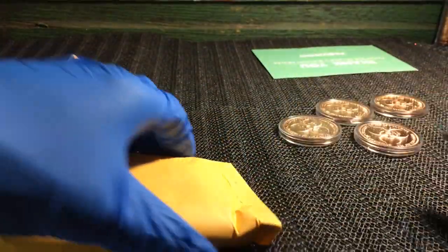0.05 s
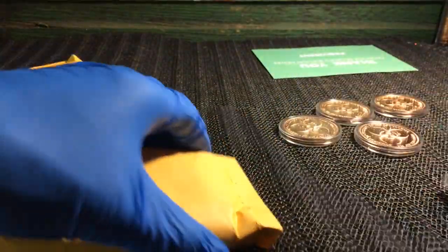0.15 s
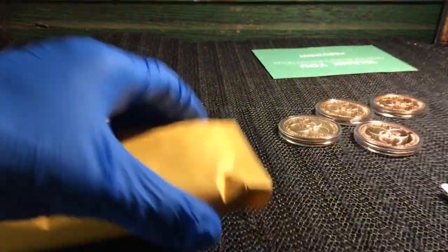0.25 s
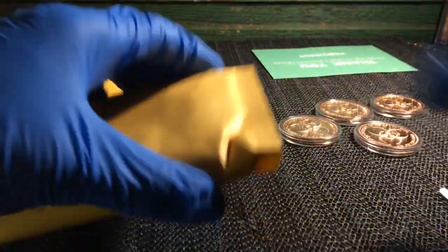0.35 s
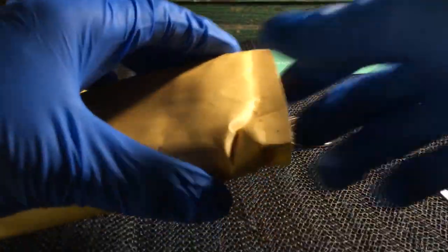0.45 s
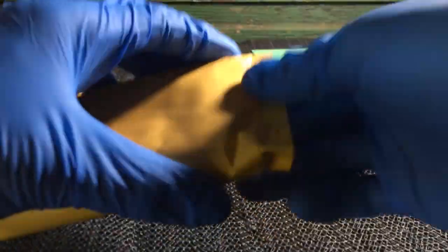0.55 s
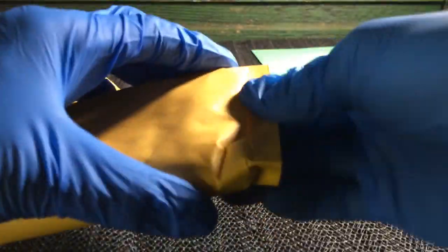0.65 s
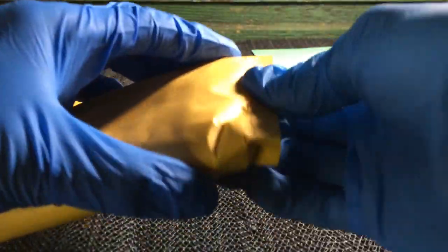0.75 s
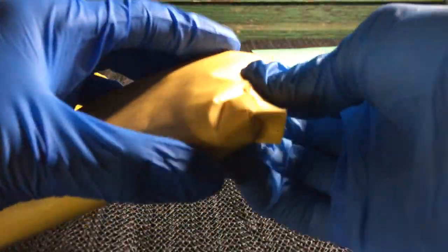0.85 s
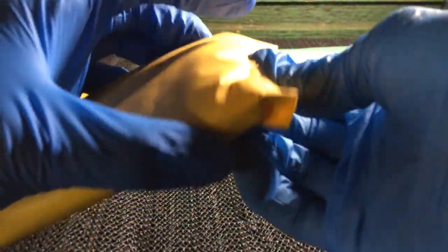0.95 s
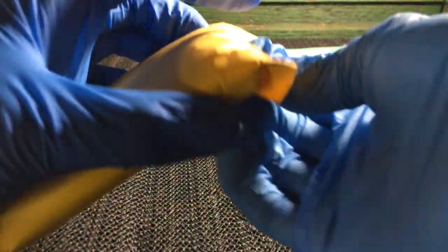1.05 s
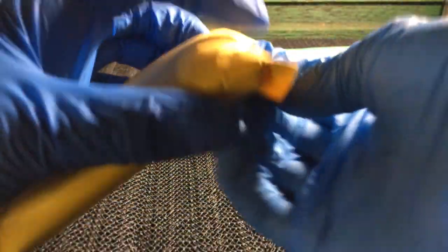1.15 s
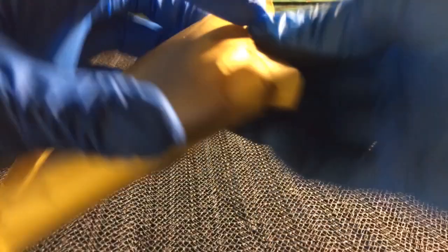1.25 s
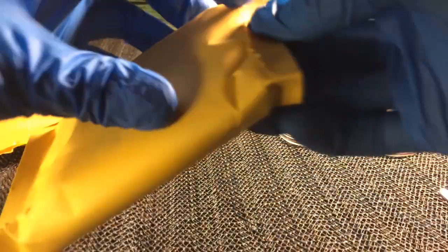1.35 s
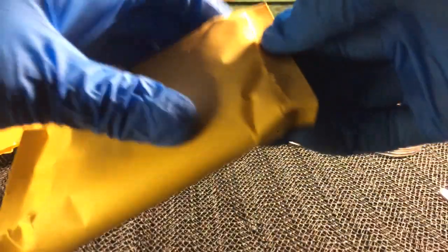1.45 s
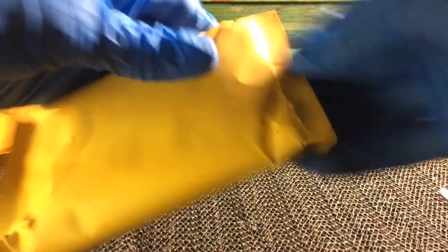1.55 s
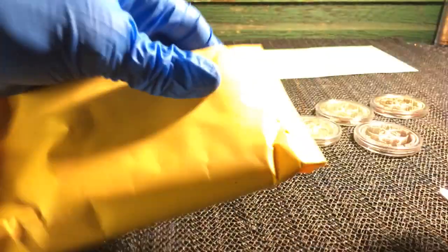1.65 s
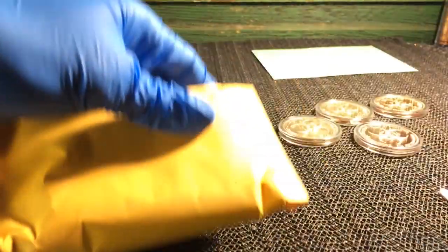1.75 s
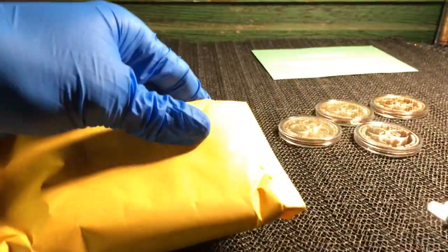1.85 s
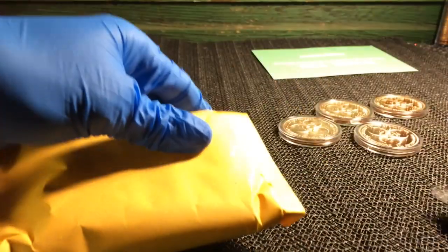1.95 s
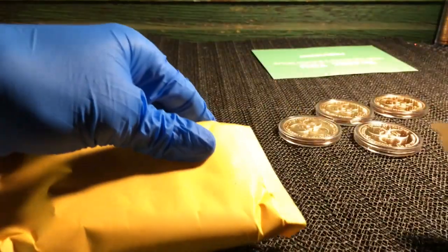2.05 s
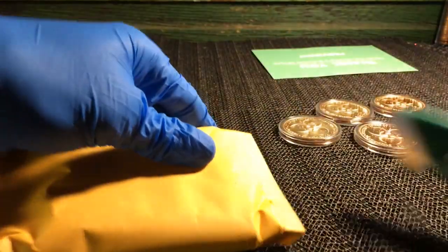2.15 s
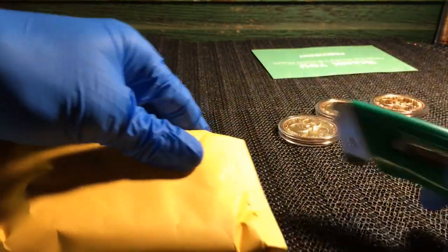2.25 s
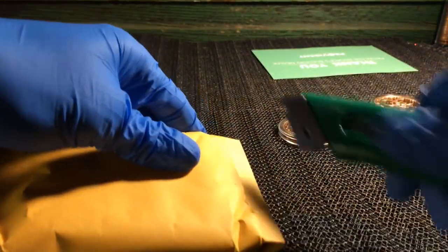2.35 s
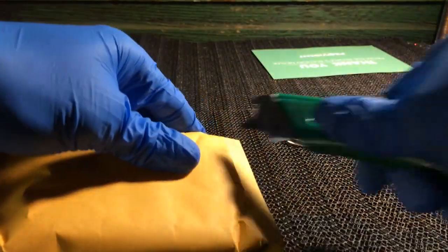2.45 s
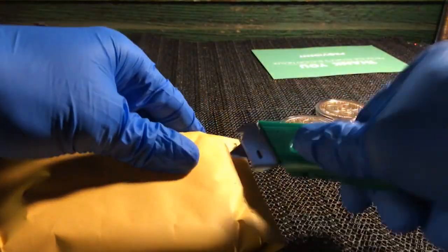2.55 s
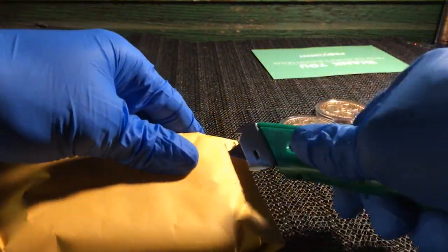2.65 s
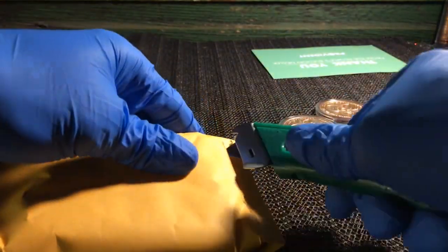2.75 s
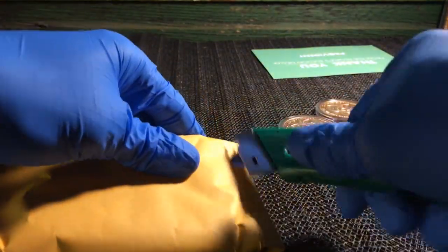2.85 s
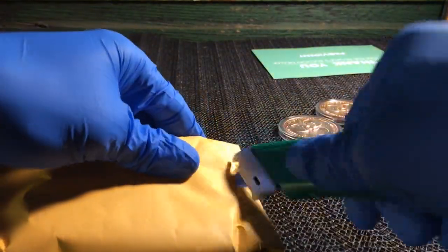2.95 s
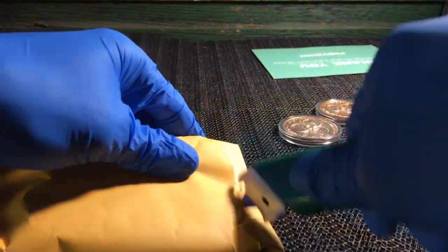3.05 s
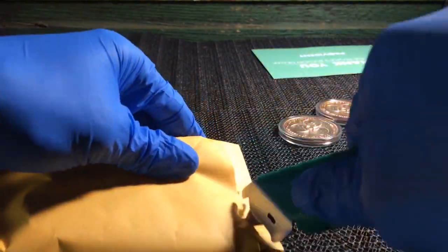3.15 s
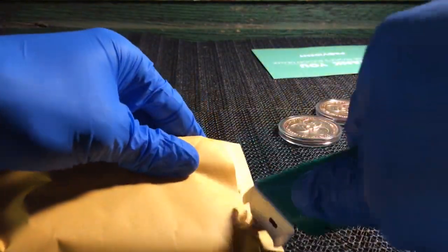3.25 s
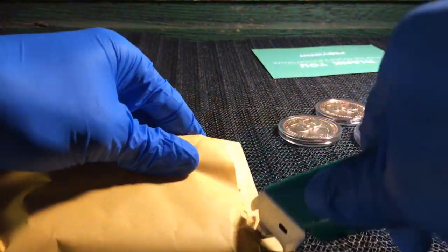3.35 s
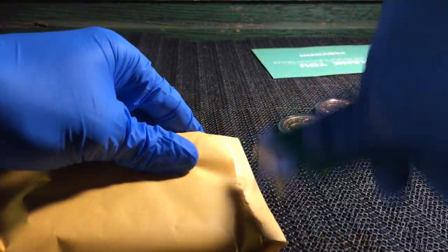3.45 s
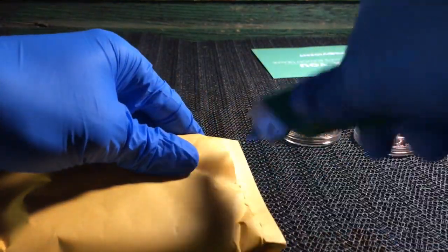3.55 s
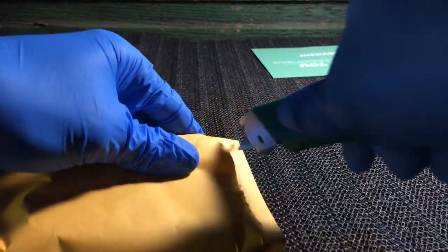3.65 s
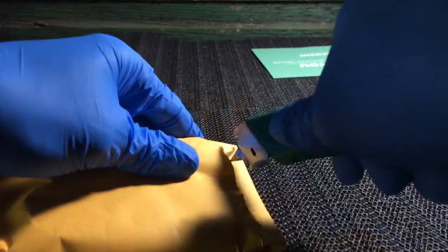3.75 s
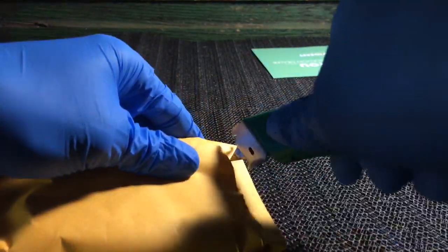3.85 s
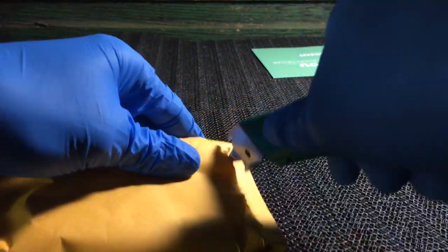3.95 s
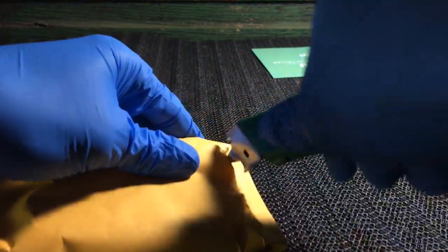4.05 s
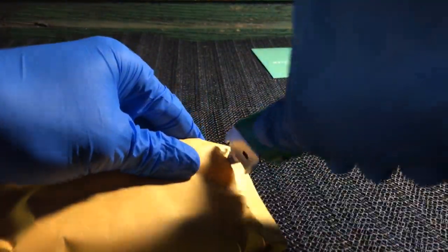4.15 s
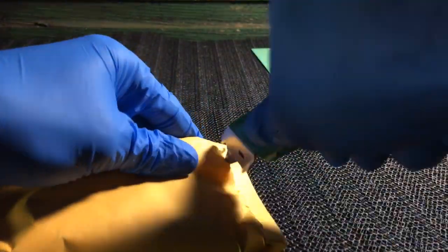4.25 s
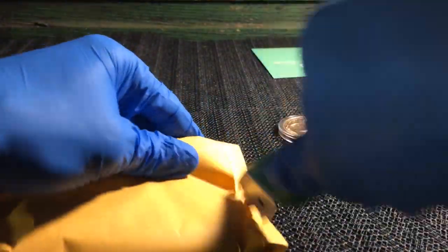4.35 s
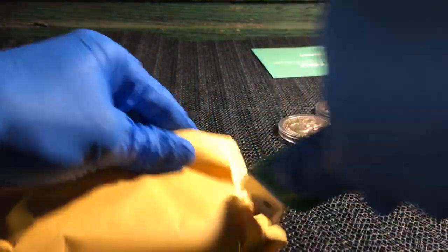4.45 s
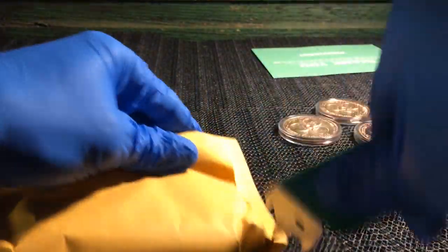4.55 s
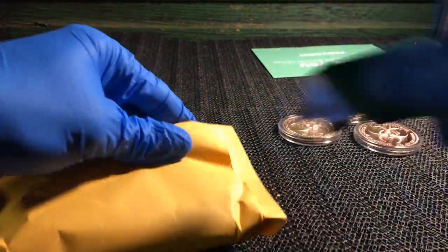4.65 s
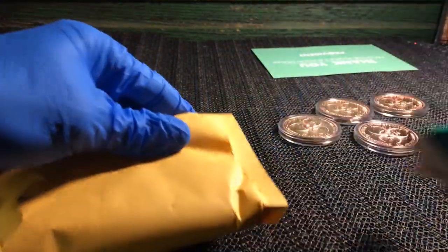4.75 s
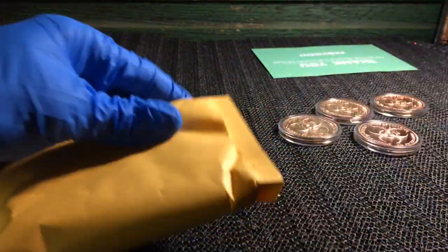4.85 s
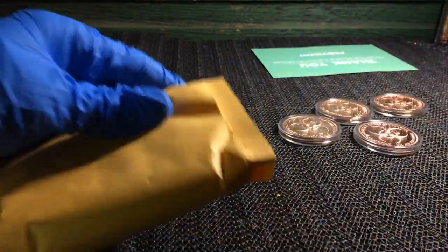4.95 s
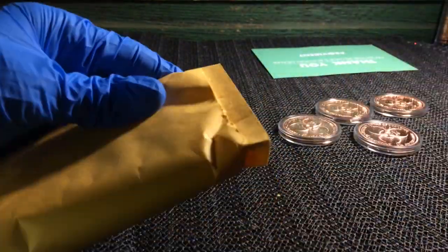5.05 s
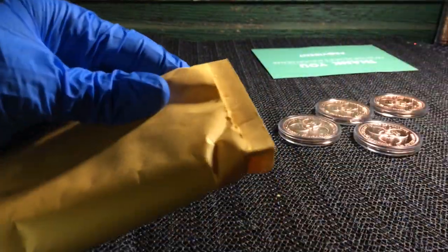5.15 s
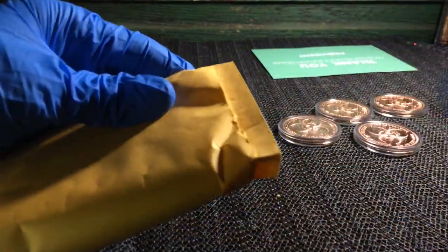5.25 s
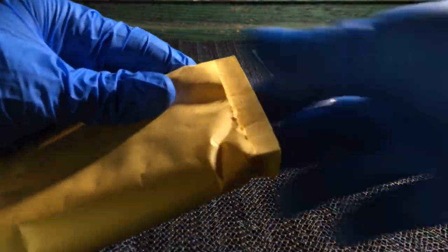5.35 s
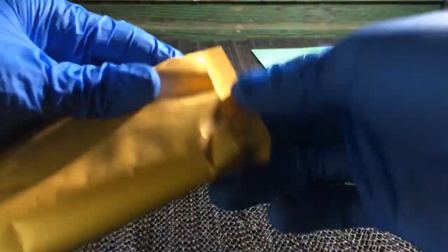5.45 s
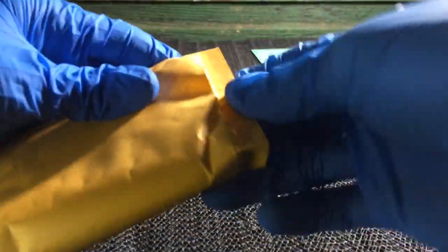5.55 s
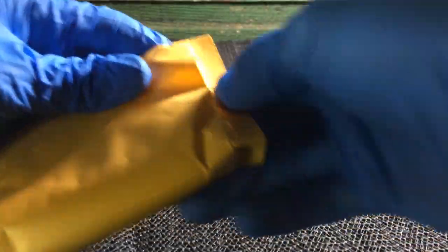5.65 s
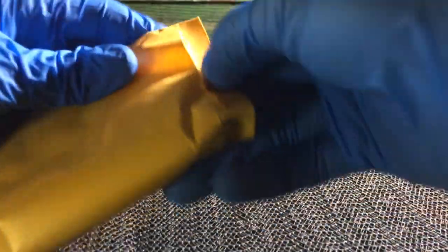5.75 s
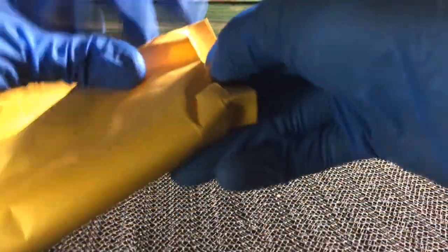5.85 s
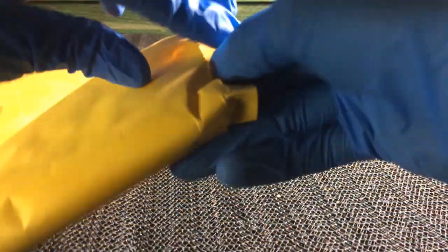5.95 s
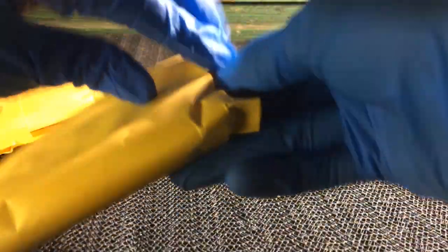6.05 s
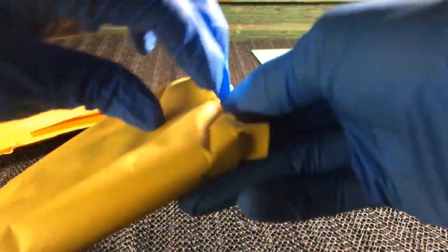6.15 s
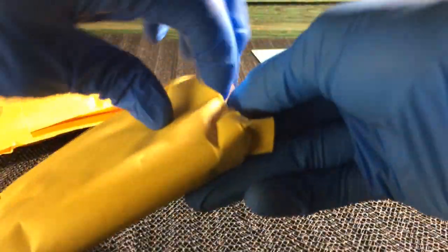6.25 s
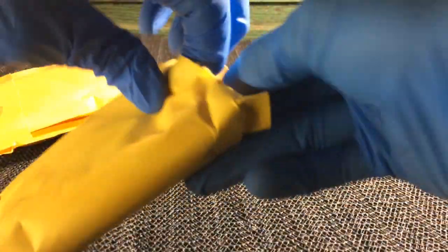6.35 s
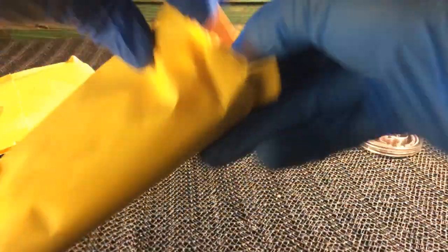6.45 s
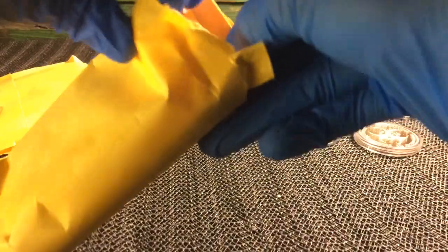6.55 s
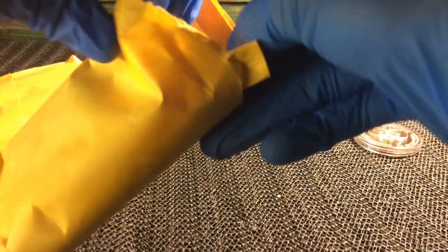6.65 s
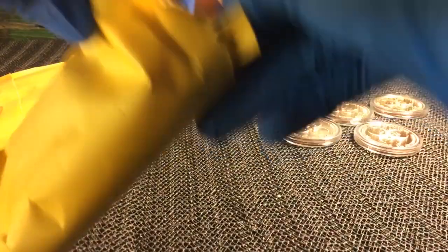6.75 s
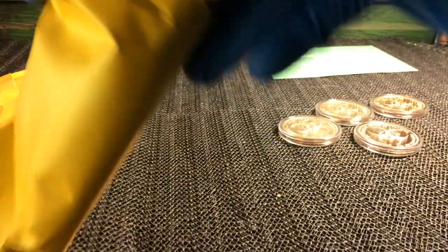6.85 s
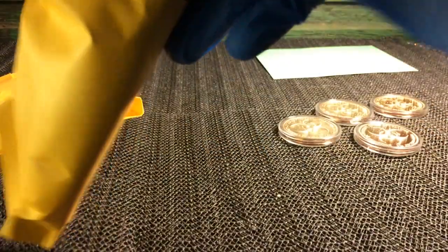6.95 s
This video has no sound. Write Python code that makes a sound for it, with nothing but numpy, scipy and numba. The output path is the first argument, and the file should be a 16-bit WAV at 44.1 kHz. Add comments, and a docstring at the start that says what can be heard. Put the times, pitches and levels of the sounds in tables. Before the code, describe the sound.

A small, quiet, dry room with faint low rumble and hiss, heard through one very close microphone. From 0 s, gloved hands lightly rub and lift a padded paper envelope, with a soft low bump at 0.3. Sharp crinkles and hollow paper pops cluster around 0.55-0.95, then looser creases and sliding rustle continue to 1.85, where a dull table bump lands. Handling quiets until a utility knife slider clicks at about 2.4-2.5, bright and hard. Fine, scratchy cutting crackles swell near 3.1, with shorter strokes at 3.35 and 3.5 and a lighter one at 4.0. A loud abrupt rip with a short glove squeak hits at 4.4, trailing scrapes to 4.6. Soft rustles and muffled thuds follow around 5.0-5.3, crinkles at 5.75 and 5.9, then a dense, crisp crumpling burst at 6.35-6.6, thinning into rubbing and a last bump near 6.9.

```python
"""Opening a padded envelope

A small quiet room, one close mono microphone over a soft mat on a table: gloved hands turn a padded paper
envelope, click out a utility knife, slit the end and tear it open. Creases snap as short damped rings over a
crackle of tiny rings and a rub of filtered noise; glove slips are gliding narrow noise. The knife rings in
modes, wrists bump the table as low booms, and near echoes and a short tail answer the paper and knife."""
import sys
import numpy as np
from scipy import signal
from scipy.fft import rfft, irfft
from scipy.io import wavfile
from scipy.ndimage import uniform_filter1d
from numba import njit

SR = 44100
rng = np.random.default_rng(int(sys.argv[2]) if len(sys.argv) > 2 else 0)


def volts_from_decibels(level):
    """Turn decibel levels (scalar or array-like) into linear amplitude factors."""
    exponent = np.asarray(level, float) / 20
    return 10 ** exponent


def dump_mix(stems):
    """Bounce the given channels to the path in sys.argv[1] as a 16-bit WAV at rate SR."""
    frames = np.atleast_2d(stems).T  # one column per channel
    limited = np.clip(frames, -1, 1)  # hard clip at full scale
    pcm = np.round(limited * 32767).astype(np.int16)
    wavfile.write(sys.argv[1], SR, pcm)


N = 308700  # samples, 7 s


def unit(x):
    """Scale to rms 1."""
    return x / np.sqrt(np.mean(x ** 2))


def peak1(x):
    """Scale to peak 1."""
    return x / np.abs(x).max()


def band(x, lo_hz, hi_hz):
    """Band-pass."""
    sos = signal.butter(2, [lo_hz, min(hi_hz, 0.45 * SR)], "band", fs=SR, output="sos")
    return signal.sosfilt(sos, x)


def ring(x, hz, t60_s):
    """One damped mode driven by x, scaled to peak 1."""
    radius = np.exp(-np.log(1000) / (t60_s * SR))
    feedback = [1, -2 * radius * np.cos(2 * np.pi * hz / SR), radius ** 2]
    return peak1(signal.lfilter([1, 0, -1], feedback, x))


def burst(decay_ms, noise):
    """A release: noise builds in about half its decay time, then dies away with a weak, longer rattle."""
    t = np.arange(len(noise)) / (max(decay_ms, 0.03) * SR / 1000)  # in decay times
    return noise * np.minimum(t / 0.58, 1) * (np.exp(-t) + 0.076 * np.exp(-t / 7.3))


def swell(ms):
    """Envelope with a quick rise, a hold and a slower fall."""
    u = np.linspace(0, 1, int(ms * SR / 1000))
    return np.minimum(u / 0.21, 1) * np.minimum((1 - u) / 0.5, 1)


def add(out, s, x):
    """Mix a sound in at time s."""
    i = int(s * SR)
    out[i:i + len(x)] += x[:N - i]


def walk(rate):
    """Random values held 1 / rate s, with the steps smoothed into slopes; spread near 1."""
    hold = int(SR / rate)
    steps = np.repeat(rng.standard_normal(N // hold + 1), hold)
    return 1.12 * uniform_filter1d(steps, hold)[:N]


@njit
def grains(start, hz, cycles, gain, length, rate):
    """Tiny damped rings, each gone after its number of cycles."""
    out = np.zeros(length)
    for k in range(len(start)):
        steps = int(cycles[k] * rate / hz[k])
        turn = np.exp(2j * np.pi * hz[k] / rate - 5 / max(steps, 1))
        z = gain[k] + 0j
        for i in range(start[k], min(start[k] + steps, length)):
            z *= turn
            out[i] += z.imag
    return out


# Room tone spectrum before scaling to rms 1: (frequency [Hz], density [dB per Hz])
TONE_SPECTRUM = [(22, -33.5), (46, -1.5), (118, -10), (179, -13.5), (780, -32), (1010, -25), (1130, -34.5),
                 (1960, -34), (2120, -36.5), (16000, -42.5)]


def room_tone(level_db=-64.5):
    """Low house rumble that swells a little, over faint hiss: noise shaped by its spectrum."""
    hz, db = np.transpose(TONE_SPECTRUM)
    f = np.maximum(np.fft.rfftfreq(N, 1 / SR), 1)
    shape = volts_from_decibels(np.interp(np.log(f), np.log(hz), db))
    noise = irfft(rfft(rng.standard_normal(N)) * shape, N)
    return volts_from_decibels(level_db + 0.85 * walk(25)) * unit(noise)


# Faint rustle while the hands only hold the parcel: (time [s], crackle level [dB])
HOLDING = [(0, -73), (.34, -65), (.37, -75.5), (.55, -70.5), (1.8, -68), (2.6, -68), (3.44, -63),
           (3.58, -68.5), (3.7, -81), (3.78, -79), (3.82, -71), (4.3, -63), (4.7, -60.5), (5.0, -58.5),
           (5.17, -64.5), (5.42, -73.5), (5.7, -70), (6.0, -70), (7, -84)]
# Squeezes, turns and cuts, each swelling to a peak and fading; times below 0.005 s act as 0.005 s:
# (peak time [s], build by 20 dB [s], fade by 20 dB [s],
#  crackle level [dB], hollow body level [dB], treble level [dB])
STROKES = [(.02, 3, 0.38, -52, -71.5, -52.5), (0.343, 1, 0, -55, -60, -60.5),
           (0.601, -0.04, 0.23, -47.5, -50, -48), (.822, .12, 0.14, -43.5, -69, -54),
           (.932, .3, 0.19, -45.5, -55.5, -52), (1.12, 0.47, 0.14, -57.5, -82, -45),
           (1.39, 0.15, 0.38, -45, -55.5, -43), (1.72, 0.51, -0.02, -48.5, -55, -53),
           (1.842, -0.27, 0.12, -50, -55.5, -52.5), (2.064, 0.03, 0.24, -50.5, -60, -59),
           (2.17, -0.17, 0.44, -54, -62, -58), (2.29, -0.2, 0, -52.5, -56, -54.5),
           (2.515, 0.12, 0.08, -44.5, -66, -49), (2.931, -0.04, .5, -61, -73, -42.5),
           (3.112, 0.18, 0.19, -38, -44, -33.5), (3.234, 0.29, 0.08, -54, -52, -44.5),
           (3.365, -0.04, 0.06, -41, -50, -34.5), (3.51, 0.014, 0.03, -36.5, -43, -35.5),
           (4.001, 0.08, .11, -49.5, -53.5, -48.5), (4.232, 0.5, 0.31, -64, -67, -66),
           (4.418, -0.03, 0.0858, -36, -37.5, -39), (4.568, 0.01, 0.12, -41.5, -47.5, -45),
           (5.12, 0.4, 0.18, -50.5, -79, -58), (5.224, -0.2, 0.14, -51, -54.5, -59),
           (5.58, 0.09, 0.2, -54, -56.5, -56.5), (5.64, 0.1, -0.3, -49, -60, -54),
           (5.741, 0.0547, 0.24, -43, -52.5, -40), (5.92, -0.15, 0, -53, -59, -68),
           (6.22, 0.27, 0.6, -48, -57, -46), (6.275, 0.43, 0.2, -58.5, -53.5, -65),
           (6.391, -0.1244, 0.14, -41, -46, -36.5), (6.539, -0.0335, 0.04, -32, -42.5, -36),
           (6.716, 0.12, .1, -40.5, -71, -41.5), (6.945, 0.03, -1, -42, -47, -47)]
# Sudden rips and scrapes along the sheet:
# (time [s], length [ms], crackle level [dB], hollow body level [dB], treble level [dB])
RIPS = [(0.135, 84, -54.5, -79, -47.5), (0.558, 34, -30.5, -50, -34.5), (1.305, 74, -43, -61.5, -43),
        (1.422, 104, -45.5, -64, -51), (1.564, 171, -48.5, -81, -41.5), (2.51, 30, -53, -75, -34.5),
        (2.634, 17.9, -40, -44.5, -42), (4.36, 79, -38.5, -42, -36.5), (4.404, 11, -20.5, -18.5, -23.5),
        (4.425, 45, -33.5, -35, -33.5), (4.529, 20, -34, -37, -43.5), (4.546, 31, -36, -36, -40),
        (4.58, 33, -59, -43.5, -41.5), (4.989, 9.9, -38.5, -58.5, -38.5), (5.445, 63, -44.5, -50, -45.5),
        (5.519, 62, -55, -54, -52.5), (5.866, 53, -42.5, -60.5, -41.5), (6.851, 87, -49.5, -45, -59)]


def effort():
    """Amplitude of hollow body, crackle and treble over time, for steady handling and for the rips."""
    t = np.arange(N) / SR
    against_crackle_db = np.array([[-5.5], [0], [-4.5]])
    power = volts_from_decibels(np.interp(t, *np.transpose(HOLDING)) + against_crackle_db) ** 2
    for s, build, fade, crackle, body, treble in STROKES:
        build, fade = max(build, 0.005), max(fade, 0.005)
        # each stroke is followed to 40 dB below its peak
        near = slice(max(int((s - 2 * build) * SR), 0), int((s + 2 * fade) * SR))
        below_db = 20 * np.where(t[near] < s, (s - t[near]) / build, (t[near] - s) / fade)
        power[:, near] += volts_from_decibels(np.array([[body], [crackle], [treble]]) - below_db) ** 2
    rips = np.zeros_like(power)
    for s, ms, crackle, body, treble in RIPS:
        for row, db in zip(rips, (body, crackle, treble)):
            add(row, s, volts_from_decibels(db) * swell(ms))
    return np.sqrt(power), rips


# How much of the handling is creasing rather than sliding: (time [s], crackle against rub [dB])
CREASING = [(0, -5.5), (.6, 1.5), (1.25, 3), (1.4, -2.5), (1.7, -1), (1.85, 0), (2.4, -4.5), (2.9, 6),
            (4.3, 4), (4.7, 1), (5.7, 3), (6.3, 3), (6.7, 0.5), (6.8, -5), (7, -0.5)]
# Centres of the hollow body, crackle and treble ranges: (body [Hz], crackle [Hz], treble [Hz])
RANGE_CENTRES = 971, 3600, 10250
# Parcel resonances that come and go as the grip changes: (frequency [Hz], width [Hz], level [dB])
PARCEL = [(900, 500, -6), (1750, 500, -9), (3300, 1300, -8)]


def handling(per_s=450, scatter_db=5.5, patchy_db=3.0, rip_crackle_db=-2):
    """Small creases crackle at chance pitches while gloves and blade rub the sheet; both come in patches."""
    creasing = volts_from_decibels(np.interp(np.arange(N) / SR, *np.transpose(CREASING)))
    total = np.sqrt(1 + creasing ** 2)
    # sliding is smoother than creasing
    patch = volts_from_decibels((patchy_db * walk(120) + 1.5 * walk(25)) * creasing / total)
    chance = rng.random((int(per_s * N / SR), 3)).T
    start = (chance[0] * N).astype(np.int64)
    size = volts_from_decibels(np.minimum(-scatter_db * np.log(1 - chance[1]), 18))
    cycles = 6.1 + 10.0 * chance[2]
    out = np.zeros(N)
    for centre_hz, steady, rips, octaves in zip(RANGE_CENTRES, *effort(), (1.35, 1.9, 1.4)):
        # every crease sounds in each range, at its own pitch and strength
        own = rng.random((len(start), 2)).T
        hz = np.minimum(centre_hz * 2 ** (octaves * (own[0] - 0.5)), 0.4 * SR)
        strength = size * volts_from_decibels(18.7 * (own[1] - 0.5))
        crease = unit(grains(start, hz, cycles, strength, N, 1.0 * SR))
        half_width = 2 ** (octaves / 2)
        rub = band(rng.standard_normal(N), centre_hz / half_width, centre_hz * half_width)
        rub = volts_from_decibels(1.0 * walk(40)) * unit(rub)
        out += steady * (creasing * crease + rub) / total
        # fibres part so densely in a rip that it is mostly rough noise
        out += rips * (volts_from_decibels(rip_crackle_db) * crease + rub)
    out = out * patch
    resonances = np.zeros(N)
    for hz, width, db in PARCEL:
        resonances += volts_from_decibels(db + 2.2 * walk(14)) * band(out, hz - width / 2, hz + width / 2)
    return out + resonances


# Single crease snaps, loud and faint:
# (time [s], crease peak [dB], crease pitch [Hz], hollow pop peak [dB], tick peak [dB])
SNAPS = [(0.0953, -3, 4820, -15.5, -17), (0.1585, -19.5, 5360, -38, -43), (0.2295, -21.5, 2400, -38, -27.5),
         (0.5684, -21, 2240, -42, -30), (0.594, -17, 5180, -51, -32), (0.763, -2, 3600, -18, -14),
         (0.797, -48, 1820, -15.5, -28), (0.8063, -16, 1940, -12.5, -27), (0.8221, -18, 1650, -13.5, -10),
         (0.8617, -22, 2240, -26, -50), (0.8718, -19.5, 5000, -30, -36), (0.9179, -3.5, 4100, -13, -11),
         (0.932, -17, 1750, -28, -37.5), (0.9364, -12.5, 3300, -18.5, -25), (0.9448, -31, 1780, -17.5, -43),
         (1.015, -50, 1820, -24.5, -22), (1.0506, -12, 3420, -37.5, -9), (1.078, -23.5, 4850, -51, -30),
         (1.119, -30.5, 4500, -69, -20.5), (1.3818, -23, 2580, -20, -28), (1.3929, -6.5, 5970, -42, -8.5),
         (1.405, -22.5, 4580, -52.5, -15), (1.4851, -17, 1710, -13.5, -27), (1.651, -12.5, 2850, -20, -38),
         (1.6962, -16.5, 3270, -14, -16.5), (1.7397, -30.5, 4590, -45, -31), (1.831, -41, 5000, -49, -39),
         (2.048, -37, 2200, -38.5, -48), (2.096, -50, 6440, -58, -31), (2.645, -19.5, 3570, -22, -21),
         (2.8314, -39, 1740, -20.5, -42), (2.8869, -26.5, 3600, -36, -29.5), (2.961, -19.5, 4200, -54, -17),
         (2.9815, -21.5, 5330, -29, -34), (2.9847, -22, 3870, -36, -18), (3.0197, -19, 5160, -32.5, -14),
         (3.0344, -18.5, 6340, -25.5, -12), (3.0385, -18, 4670, -33, -15.5), (3.0768, -21, 6640, -41, -15),
         (3.096, -9.5, 6400, -18, -24), (3.1035, -10.5, 2820, -10, -11), (3.1154, -15, 4190, -27, -9.5),
         (3.1261, -8.5, 6560, -17, -11), (3.194, -33, 1870, -16.5, -41), (3.2358, -22, 4750, -17, -19),
         (3.241, -33, 2650, -29, -18), (3.3604, -19, 2740, -21, -7), (3.3699, -19, 2660, -22.5, -28),
         (3.374, -18, 5530, -20.5, -18), (3.4914, -17.5, 5560, -47, -15.5),
         (3.5147, -22, 3030, -24.5, -23.5), (3.5227, -15.5, 2980, -17.5, -15),
         (3.7995, -24.5, 3640, -31, -19.5), (3.8053, -28, 3560, -37.5, -32),
         (3.9381, -27, 3250, -35.5, -44), (3.9886, -21.5, 3300, -23, -38), (4.0042, -9.5, 3300, -27, -9),
         (4.0318, -26.5, 3440, -61, -35), (4.0434, -28.5, 4370, -61, -24), (4.071, -36, 2450, -29.5, -31),
         (4.173, -46, 1690, -41.5, -40.5), (4.2167, -41, 1870, -27.5, -36), (4.233, -18.5, 2240, -24, -53),
         (4.323, -41, 5880, -48, -39), (4.4041, -4.5, 3270, -9, -5), (4.4343, -17, 3400, -16, -15),
         (4.6892, -38, 2740, -34, -49), (4.9895, -21, 1850, -40, -35), (5.0129, -26, 2640, -23, -42),
         (5.0861, -19.5, 2600, -42, -19), (5.127, -21.5, 2200, -51, -25), (5.4557, -29, 2460, -30, -25),
         (5.473, -26, 2500, -34, -22.5), (5.5624, -48, 6730, -24.5, -37), (5.7013, -22, 4530, -37, -25),
         (5.7299, -24.5, 2340, -27.5, -20.5), (5.777, -39, 6900, -48, -19),
         (5.9073, -20, 2350, -17.5, -47.5), (5.915, -13, 1800, -10.5, -36),
         (6.0213, -28.5, 4210, -45, -30.5), (6.3047, -44, 1670, -27, -46), (6.363, -4.5, 2960, -23, -4.5),
         (6.3893, -4, 4600, -19.5, -1), (6.3948, -5.5, 3180, -23.5, -13), (6.4011, -39, 5740, -33, -9),
         (6.422, -24, 2810, -32, -23), (6.4515, -12, 2580, -26.5, -7), (6.4937, -7.5, 2660, -18.5, -2.5),
         (6.5, -18, 1990, -24.5, -10), (6.5092, -19, 2510, -39, -8), (6.5135, -12, 2730, -36, -5),
         (6.521, -12, 2590, -29, -1.5), (6.5314, -6.5, 2220, -16, -3), (6.5378, -20, 2460, -41, -18),
         (6.548, -6.5, 2870, -33, -0.5), (6.553, -7, 1850, -20.5, -7.5), (6.5625, -18, 2640, -35, -3),
         (6.579, -17.5, 3630, -31, -19), (6.5902, -13, 1650, -13.5, -12), (6.6051, -27, 6800, -49, -11),
         (6.6112, -28, 4060, -46, -19), (6.6464, -16.5, 4050, -39, -21), (6.6855, -38, 2900, -49, -20),
         (6.693, -15, 1650, -23, -12), (6.7043, -45.5, 2680, -42, -14.5), (6.727, -25, 5050, -36, -18),
         (6.8, -31.5, 6730, -52, -25)]


def snaps():
    """A crease buckles: it rings a few cycles, pops the air pocket and ticks."""
    out = np.zeros(N)
    for s, db, hz, pop_db, tick_db in SNAPS:
        chance = rng.standard_normal(1024)
        push = burst(0.37 * volts_from_decibels(6.5 * np.tanh(chance[-2])), chance)
        # air and slack paper follow only the slow part of the release
        pocket_hz = 930 * volts_from_decibels(1.2 * np.tanh(chance[-1]))
        pop = band(ring(push, pocket_hz, 0.0045), 350, 2100)
        crease = band(ring(push, hz, 8.7 / hz), 0.32 * hz, 2.5 * hz)
        crease = band(crease, 0.33 * hz, 2.3 * hz)
        tick = band(push, 7100, 15000)
        snap = volts_from_decibels(db) * peak1(crease) + volts_from_decibels(pop_db) * peak1(pop) + volts_from_decibels(tick_db) * peak1(tick)
        add(out, s, snap)
    return out


# Gloves dragging over the taut sheet or the knife's shell, which sing in a narrow range:
# (time [s], length [ms], level [dB], start pitch [Hz], end pitch [Hz])
DRAGS = [(.12, 65, -46, 1630, 1710), (2.151, 95, -58, 1730, 1670), (2.43, 170, -55.5, 3280, 3270),
         (4.372, 90, -28.5, 850, 1042), (5.085, 40, -40.5, 1584, 2093), (5.085, 68, -47.5, 2750, 3270),
         (6.76, 260, -47.5, 1757, 1780), (4.549, 25, -34, 1000, 876), (6.912, 46, -44.5, 3300, 3900)]


def drags():
    """Slips of the glove: slow noise carried on a gliding pitch makes a rough narrow band."""
    out = np.zeros(N)
    for s, ms, db, start_hz, end_hz in DRAGS:
        shape = swell(ms)
        phase = 2 * np.pi * np.cumsum(np.linspace(start_hz, end_hz, len(shape))) / SR
        slips = uniform_filter1d(rng.standard_normal((2, len(shape))), 90)
        voice = slips[0] * np.cos(phase) + slips[1] * np.sin(phase)
        add(out, s, volts_from_decibels(db) * shape * unit(voice))
    return out


# Bumps through the table: (time [s], boom peak [dB], pitch [Hz], t60 of each of two chained modes [s])
BUMPS = [(0.209, -51, 84, 0.052), (0.26, -45, 93.5, 0.054), (0.313, -32, 93.6, 0.049),
         (0.916, -26, 191, 0.0074), (1.378, -38, 143, 0.019), (1.65, -43, 129, 0.027),
         (1.851, -34, 96, 0.078), (1.928, -45.5, 73, 0.038), (4.407, -36, 74.4, 0.072),
         (4.555, -43.5, 210, 0.072), (4.58, -41, 94, 0.048), (4.99, -45, 151, 0.016),
         (5.143, -38.5, 99, 0.12), (5.224, -29, 222.5, 0.051), (5.25, -30, 111, 0.035),
         (5.286, -39.5, 98, 0.054), (5.735, -47.5, 122, 0.029), (5.909, -42.5, 235, 0.019),
         (6.361, -29, 153, 0.011), (6.9, -39, 150, 0.025)]


def bumps():
    """Soft blows of wrist and parcel: the mat cushions them, so the table's boom swells before it dies."""
    out = np.zeros(N)
    for s, db, hz, t60_s in BUMPS:
        push = np.r_[1.0, np.zeros(SR // 4)]
        boom = ring(ring(push, hz, t60_s), hz, t60_s)
        # a higher mode of the table top, shaken unevenly
        knock = ring(burst(3.3, rng.standard_normal(len(push))), 2.2 * hz, 0.06)
        add(out, s, volts_from_decibels(db) * (boom + volts_from_decibels(-10) * band(knock, hz, 4 * hz)))
    return out


# Knife slider notches: (time [s], peak [dB], push decay [ms])
NOTCHES = [(2.392, -20, 2.1), (2.463, -0.5, 0.79), (2.51, -4, 1.9)]
# Modes of the knife's shell and blade: (frequency [Hz], level [dB], t60 [s])
KNIFE_MODES = [(164, -17, 0.012), (1630, -13.5, 0.0078), (3233, -0.5, 0.0089), (4100, -2, 0.0027),
               (4810, -3, 0.0043), (6930, -8.5, 0.0035), (8500, -11, 0.0023), (10330, -3.5, 0.0011),
               (12560, -7.5, 0.0015), (16570, -6.5, 0.0037)]


def knife():
    """The slider drops into a notch and the plastic shell and blade ring."""
    out = np.zeros(N)
    for s, db, ms in NOTCHES:
        # a one-sided shove under the noise
        push = burst(ms, 0.25 + rng.standard_normal(4096))
        click = sum(volts_from_decibels(mode_db) * ring(push, hz, t60_s) for hz, mode_db, t60_s in KNIFE_MODES)
        add(out, s, volts_from_decibels(db) * peak1(click))
    return out


# Echoes off the table top and near wall: (delay [ms], level [dB])
ECHOES = [(2.3, -21.5), (3.7, -29), (8.5, -29.5)]


def room(x, t60_s=0.1, tail_db=-21):
    """A few near echoes and a short diffuse tail of decaying noise."""
    t = np.arange(SR // 3) / SR
    tail = band(rng.standard_normal(len(t)), 290, 11000)
    tail = tail * volts_from_decibels(-60 * t / t60_s) * np.minimum(t / 0.0028, 1)
    response = volts_from_decibels(tail_db) * tail / np.sqrt(np.sum(tail ** 2))
    response[0] = 1  # direct sound
    for ms, db in ECHOES:
        response[int(ms * SR / 1000)] += volts_from_decibels(db)
    return signal.fftconvolve(x, response)[:N]


def scene():
    """Paper and knife in the room, with table bumps and room tone added dry."""
    # paper, snaps and slips carry little below 130 Hz
    paper = band(handling() + snaps() + drags(), 130, 19000)
    return (room(paper + knife()) + bumps() + room_tone())[None]


def band_limit(x):
    """A steep low-pass at the top of the band."""
    return signal.sosfilt(signal.butter(12, 16860, fs=SR, output="sos"), x)


def record(dry):
    """A steep low-pass cuts the top above 16.3 kHz."""
    top_cut = signal.ellip(8, 0.2, 70, 16300, fs=SR, output="sos")
    mix = signal.sosfilt(top_cut, dry)
    return band_limit(mix)


dry = scene()
out = record(dry)
dump_mix(out)
```